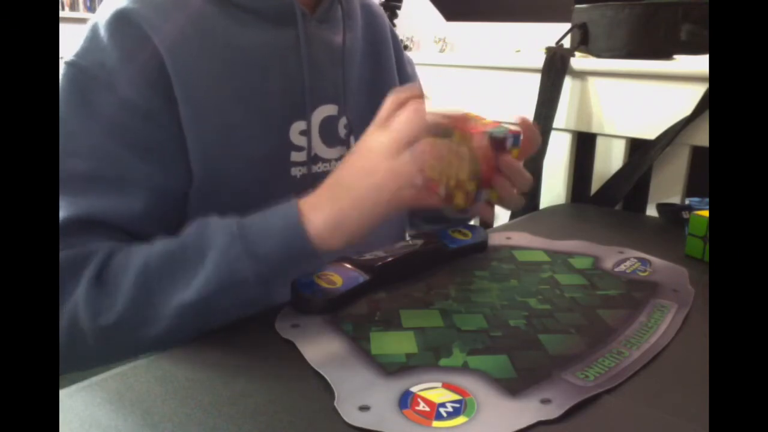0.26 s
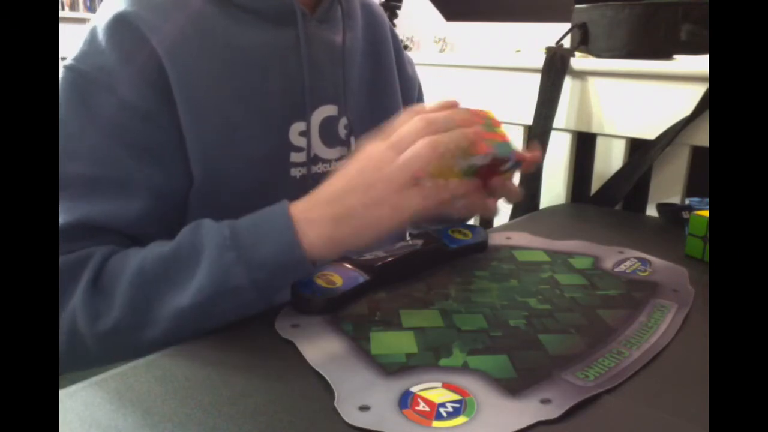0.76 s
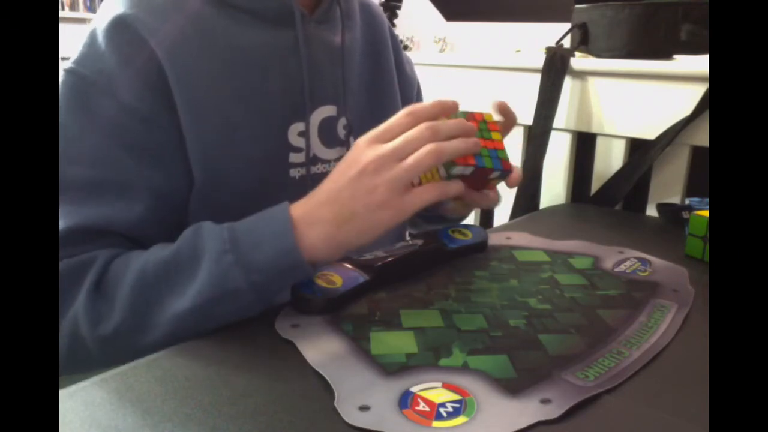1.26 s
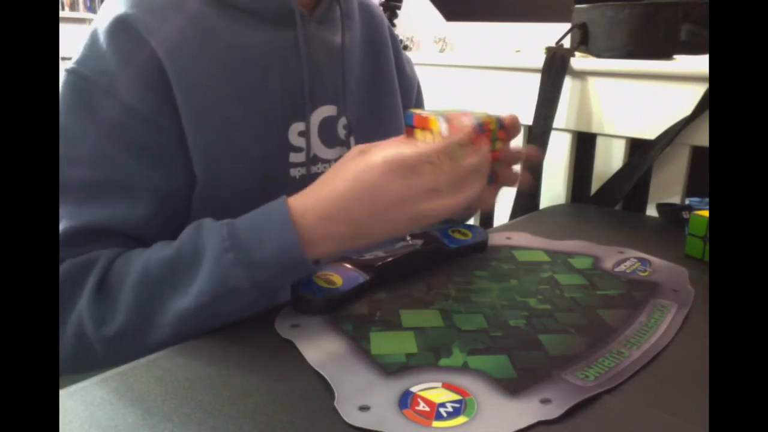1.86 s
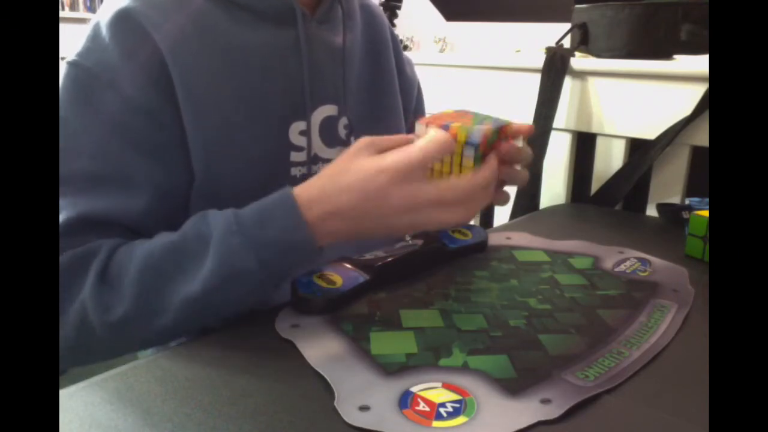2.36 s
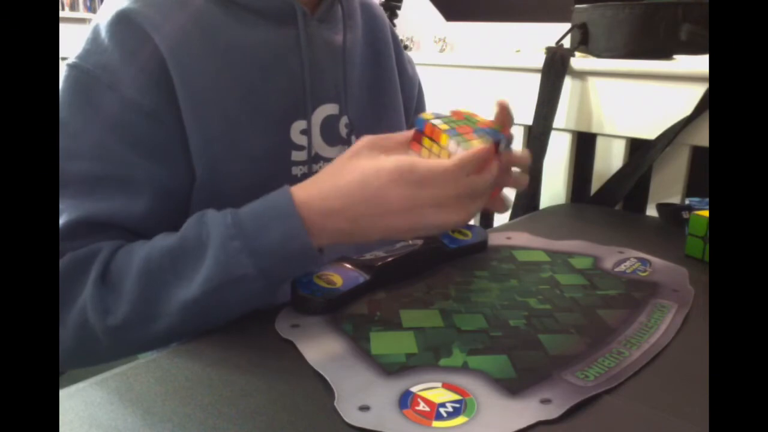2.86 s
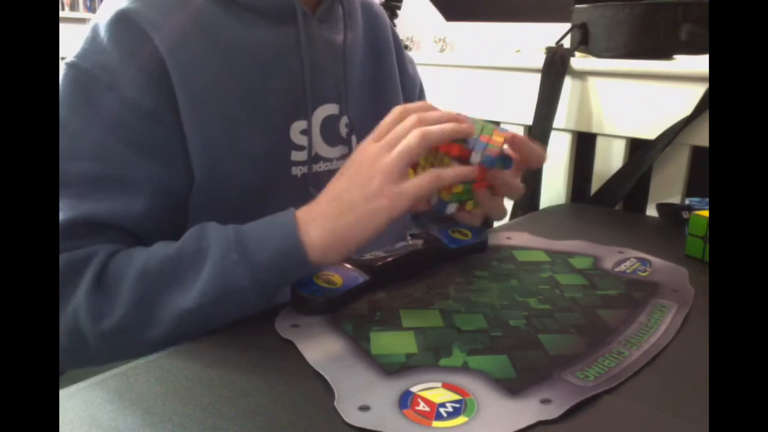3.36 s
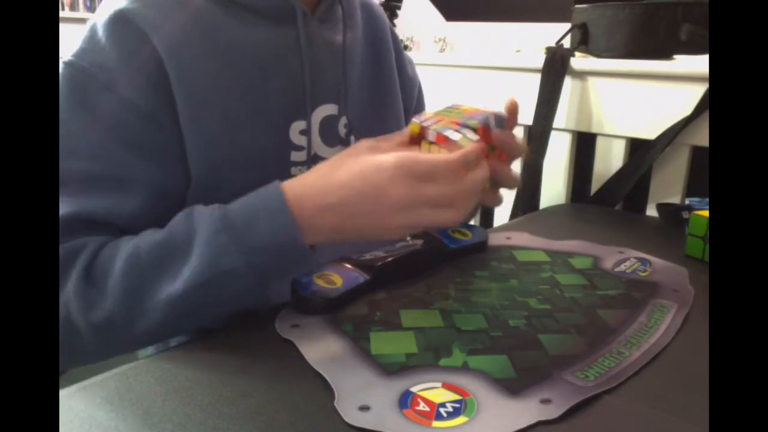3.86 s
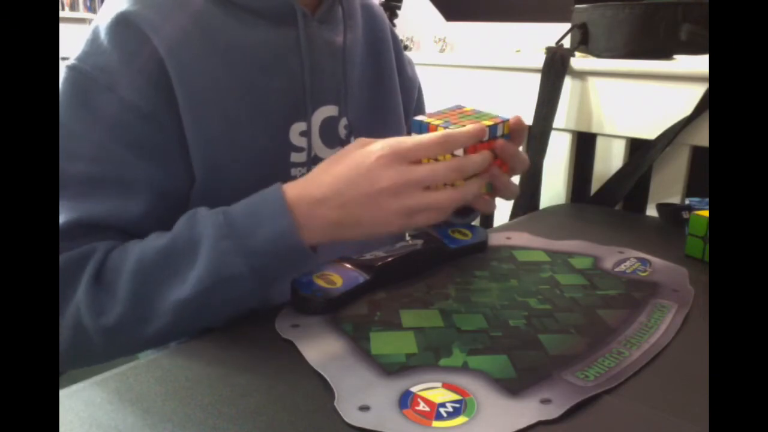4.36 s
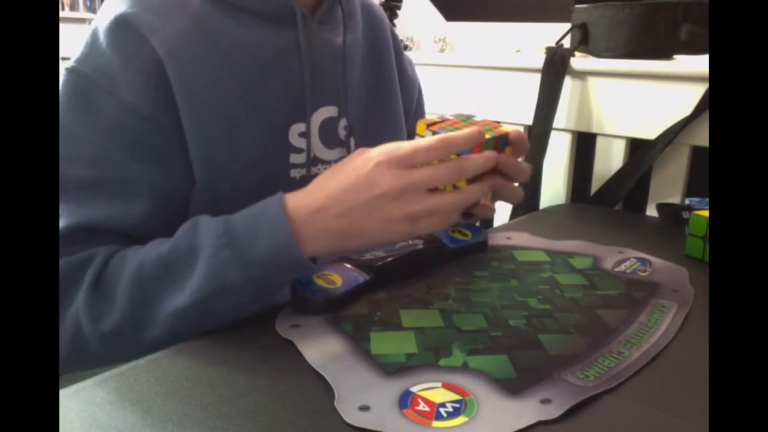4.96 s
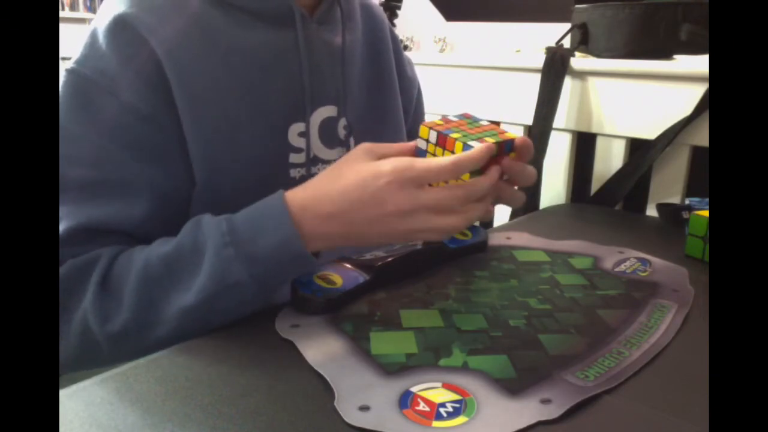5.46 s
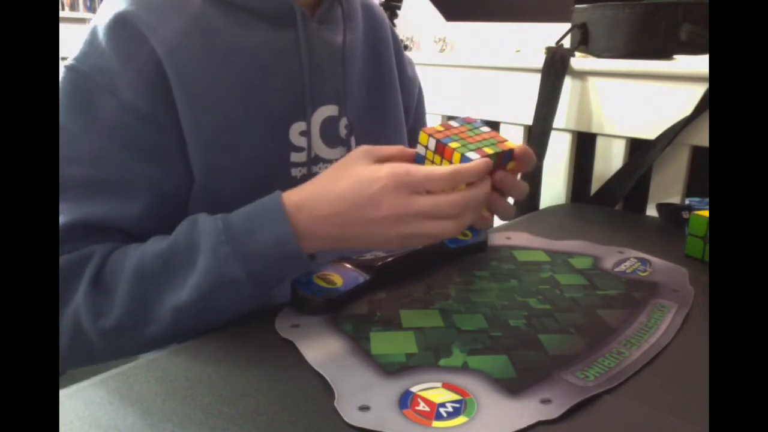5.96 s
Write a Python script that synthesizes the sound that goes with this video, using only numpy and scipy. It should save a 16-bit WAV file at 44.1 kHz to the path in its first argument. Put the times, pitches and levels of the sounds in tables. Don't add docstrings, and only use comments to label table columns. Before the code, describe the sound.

Small plastic pieces rattle, catch and snap as hands work a puzzle cube at a desk. After an immediate hard burst comes near-quiet, a brief stutter and a slap, then several tight runs of bright clicks and hollow clacks. A palm knock and wooden creak close the long run; a final turn and slaps follow. Close, dry sound with short room reflections and faint airy hum.

```python
import sys
import numpy as np
from scipy import signal
from scipy.io import wavfile
from scipy.ndimage import uniform_filter1d

SR = 44100
rng = np.random.default_rng(int(sys.argv[2]) if len(sys.argv) > 2 else 0)


def wav_record(signal):
    frames = np.transpose(np.atleast_2d(signal))
    bounded = np.clip(frames, -1, 1)
    quanta = np.round(bounded * 32767).astype(np.int16)
    wavfile.write(sys.argv[1], SR, quanta)


def voltage_ratio(level):
    return 10 ** (np.asarray(level, float) / 20)


N = 274302

# frequency in Hz, level in dB.
SLIDE_COLOUR = [(820, -26.5), (1400, -6.5), (2780, -3), (4360, -1), (8310, -10), (9620, -8.5),
                (13700, -9.5), (15400, -14.5), (16900, -24)]
# frequency in Hz, width in Hz (wider dies faster), level in dB.
CUBE_BODY = [(587, 130, -6), (808, 130, 1.5), (1084, 140, -3), (1460, 520, 13.5)]
# start in seconds, blow in dB, crack in dB relative to it, bounce delay in seconds, bounce in dB relative.
FLAT_SLAPS = [
    (1.9505, -15, -10.5, .0018, -13),
    (4.1437, -16, -1.5, .0013, 1.5),
    (4.8091, -17, 3.5, .0016, 0.5),
    (5.124, -29.5, 1.5, .0016, -2),
]


def evened(x):
    return x / np.sqrt(np.mean(x ** 2) + 1e-20)


def read(points, hz):
    f, value = np.transpose(points)
    return np.interp(np.log(hz + 1), np.log(f + 1), value)


def add(mix, s, sound):
    part = mix[max(round(s * SR), 0):][:len(sound)]
    part += sound[:len(part)]


def ring(modes, detune, phases, t, rise):
    x = 0
    for (hz, width, db), d, phase in zip(modes, detune, phases):
        fade = np.exp(-np.pi * width * t)
        x = x + voltage_ratio(db) * fade * np.sin(2 * np.pi * (hz * d * t + phase))
    x = x * (1 - np.exp(-(t / rise) ** 2))
    return x / np.abs(x).max()


def coloured(x, points):
    gain = np.log(voltage_ratio(read(points, np.abs(np.fft.fftfreq(4096, 1 / SR)))))
    taps = np.fft.ifft(np.exp(np.conj(signal.hilbert(gain)))).real[:1024]
    return signal.oaconvolve(x, taps)[:len(x)]


def snaps():
    # frequency in Hz, width in Hz, level in dB.
    edge_tones = [(9630, 510, -6), (10550, 670, -3.5), (11850, 770, -1.5), (14230, 1700, 1.5)]
    out, shake = np.zeros(N), np.zeros(N)
    t = np.arange(1200) / SR
    chatter = voltage_ratio(-12.0) * np.exp(-t / 0.00052) + voltage_ratio(-14) * np.exp(-t / 0.004)
    chatter = chatter * (1 - np.exp(-(t / .0004) ** 2))
    scrape = voltage_ratio(-20) * np.exp(-t[:200] / .0015)[::-1]
    rows = blows()
    chance = rng.random((len(rows), 24))
    for (s, db, rings, body_db, tick_db, crack_db, jammed, detuned), c in zip(rows, chance):
        detune = 1 + .16 * (c[:12] - .5)
        width = 460 + 480 * jammed ** 2
        piece = [(rings[0], width, 0), (rings[1], width, -5), (rings[2], width, -8)]
        rise = .00045 if jammed else .0011
        sound = ring(piece, [1, *detune[1:3] ** detuned], c[12:], t, rise)
        body_db = body_db + 3 * (2 * c[3] - 0.5)
        sound = sound + voltage_ratio(body_db) * ring(CUBE_BODY, detune[4:], c[16:], t, rise=0.0017)
        sound = sound + voltage_ratio(tick_db + 0.8) * ring(edge_tones, detune[8:], c[20:], t, rise=0.0004)
        add(out, s - .0003, voltage_ratio(db - 2.08) * sound)
        add(shake, s - .0003, voltage_ratio(db + crack_db) * chatter)
        add(shake, s - len(scrape) / SR, voltage_ratio(db + crack_db) * scrape)
    drive = shake * rng.standard_normal(N)
    crack = coloured(drive, SLIDE_COLOUR)
    return out + crack * np.std(drive) / np.std(crack)


def blows():
    # start in seconds, blow in dB, ring in Hz, edge tick in dB relative to the blow.
    clacks = [(.0545, -9.5, 4100, -13), (.0655, -16, 3490, -7.5), (.0732, -16, 3700, -3.5),
              (.1146, -12.5, 3100, -12.5), (.1223, -5.5, 2560, -9.5), (.1319, -2.5, 2160, -8.5),
              (.1388, -4.5, 3750, -17.5), (.1608, -3.5, 4800, -20.5), (.1782, -3, 2200, -13),
              (.2057, -16, 2280, -11.5), (1.3763, -16.5, 3280, -8), (2.2444, -22.5, 4510, -1),
              (2.2772, -8, 3450, -5.5), (2.3432, -24, 3660, 2), (2.4036, -14, 2600, -14),
              (2.7593, -13.5, 3600, 4.5), (2.9022, -6, 2240, 0.5), (2.9108, -13.5, 4200, 3),
              (2.9273, -18.5, 3140, 4.5), (3.2349, -21, 3700, -2), (3.2482, -18.5, 2470, -4),
              (3.4079, -20.5, 5000, -10), (3.5421, -17.5, 4330, -1), (3.5526, -14.5, 4300, -6),
              (3.5666, -6.5, 3120, -13.5), (3.5916, -19.5, 2430, -18), (3.6081, -25, 4750, -2),
              (3.9845, -19.5, 3920, -9), (3.9976, -19, 3900, -13), (4.0201, -26, 2550, -22),
              (.1537, -6, 1597, -12)]
    catches = [(.0367, -24, 3810, 0.5), (.046, -18, 3140, 5.5), (.0826, -17, 4500, 12),
               (.092, -20.5, 4990, 9.5), (.1516, -5, 4210, 4), (1.3074, -25.5, 4730, 9),
               (1.3672, -26.5, 3350, 6), (1.8189, -38.5, 3190, -4), (2.1571, -16.5, 4460, 6),
               (2.2002, -23.5, 3620, 6), (2.2411, -23.5, 4330, 4), (2.2535, -13, 4600, 0.5),
               (2.2639, -23, 4580, 4), (2.3963, -12.5, 3900, 2), (2.413, -20, 4130, 10.5),
               (2.8131, -26.5, 4500, 13.5), (2.8622, -24, 4480, 6.5), (2.875, -23, 4460, 6),
               (2.917, -18, 2800, 4.5), (3.2396, -23.5, 3440, -1), (3.4208, -15.5, 4470, 7.5),
               (3.7708, -26, 4300, 4), (3.8044, -18, 4100, 4), (3.8189, -24, 3340, 8),
               (3.8754, -18, 2900, 2), (3.9713, -12, 3200, 0.5), (4.0066, -22, 4230, 2),
               (1.829, -44, 4200, 8), (2.872, -21, 3800, -6), (2.8815, -24, 4100, 6),
              (2.9228, -16, 3900, -2), (2.9435, -20, 4400, -12), (3.2281, -20, 3550, 1),
              (3.4148, -21, 4500, 0), (3.4293, -20, 4800, 0), (3.4237, -24, 7100, -1), (3.7, -23, 4300, 0),
              (3.243, -22, 3400, 3), (3.2537, -23, 3500, -1), (3, -33, 3900, 3), (2.7335, -23.5, 5600, 6),
              (2.7455, -14, 2900, 6), (2.824, -31.5, 3700, 5), (2.829, -33.5, 4200, 4.5),
              (2.7665, -19, 3800, 3), (3.9665, -17.5, 3300, -6), (3.8975, -14, 3600, -8),
              (0.0056, -48, 3700, 8), (.133, -16, 3900, 6), (2.1275, -24, 4100, 4), (3.7962, -21, 6900, 6),
              (3.4315, -26, 5900, -4), (3.8, -26, 4900, -4), (2.7, -31, 1940, -8), (2.8745, -23, 3900, 2)]
    clicks = [(.1702, -10.5, 3325, -8.5), (.1862, -9, 2980, -15.5), (.2023, -4.5, 3890, -22),
              (1.3119, -19, 3460, -15), (1.393, -17.5, 2914, -13), (2.1467, -11.5, 3960, -12),
              (2.1528, -13, 4240, -1.5), (2.1665, -10.5, 4300, -3), (2.1911, -18.5, 3170, -15),
              (2.3835, -16.5, 3600, -3), (2.3891, -16, 3150, -14), (2.7409, -12, 3720, -3),
              (2.7479, -6.5, 3280, -5.5), (2.7785, -18.5, 3644, -8), (2.8796, -17, 4100, -11),
              (2.8928, -13.5, 4270, -15), (2.9375, -12, 3700, -21), (3.5782, -13, 4230, -1),
              (3.7147, -14.5, 4620, -4.5), (3.7905, -20, 4100, -2), (3.8951, -7, 4700, -9),
              (3.9055, -6.5, 3230, -11), (3.9188, -11.5, 2980, 2), (3.9331, -14, 3585, -4),
              (4.6612, -18, 4675, -18), (4.6643, -14, 4700, -22), (4.6738, -15, 3240, -16),
              (4.6803, -12, 3600, -10), (4.6915, -5, 3700, -22.5), (4.7195, -14.5, 4000, -10),
              (4.1413, -29.5, 3902, -14), (4.1375, -42, 4300, -14), (1.9478, -42.5, 3600, -14),
             (3.6913, -32.5, 4200, -14), (3.699, -29, 5200, -10), (3.7115, -27, 4500, -7),
             (3.7628, -29.5, 3700, -6), (3.753, -37.5, 4300, -10), (3.788, -29, 3900, -4),
             (3.7945, -19.5, 3860, -4), (3.8959, -10.5, 5650, -8), (3.8104, -27, 3000, -3),
             (1.3092, -24, 3300, -0.5), (1.3178, -25.5, 3200, 0), (1.326, -23.5, 3300, 0.5),
             (1.3515, -26, 3200, -8), (1.376, -19, 2680, -8.5), (1.3852, -23.5, 4000, -4.5),
             (1.3941, -19.5, 3320, -10), (1.424, -36.5, 3500, 5.5), (2.1605, -17.5, 5400, -8),
             (2.168, -16.5, 3500, -5), (2.2785, -15.5, 4300, -11), (2.3005, -21, 3600, -2),
             (2.7396, -17, 1790, -4), (2.749, -10, 4140, 2), (2.7605, -14, 2820, -3),
             (2.7734, -18.5, 3300, -5), (.0378, -25.5, 3400, 0), (0.0706, -19, 3000, 3),
             (.08, -22.5, 3200, 0), (0.139, -6.5, 4600, -6), (3.565, -13, 4500, -8),
             (3.5685, -14, 2000, -10), (3.548, -21, 2000, -4), (3.554, -19, 1900, -4),
             (2.892, -18, 4400, -2)]
    # start in seconds, blow in dB, ring in Hz.
    nudges = [(.0108, -25, 4350), (1.2955, -26.5, 4100), (1.2993, -25.5, 4740), (1.3275, -22.5, 3360),
              (1.3425, -23.5, 3600), (1.3549, -20, 4450), (2.125, -19, 3800), (2.1777, -24, 3820),
              (2.2178, -23, 4300), (2.3029, -20.5, 3500), (2.3115, -24, 2950), (2.7087, -23, 3520),
              (2.7187, -22.5, 4440), (2.8336, -24, 3140), (3.2318, -23, 3900), (3.2914, -22, 3940),
              (3.386, -27, 4100), (3.3948, -21.5, 3930), (3.5223, -22, 4230), (3.5299, -25, 4420),
              (3.7603, -24, 4440), (4.6432, -35, 4900), (4.7353, -22, 3900)]
    # start in seconds, blow in dB, ring in Hz.
    settles = [(0.029, -35, 3150), (.3603, -36, 3320), (0.7384, -40.5, 2887), (1.5462, -42, 3000),
               (1.838, -32, 4210), (2.079, -45, 3880), (2.1004, -35, 3600), (2.1125, -34.5, 3980),
               (2.115, -40, 4100), (2.359, -32, 3560), (2.3699, -32, 3800), (2.4564, -48, 4510),
               (2.5302, -45, 3730), (2.5639, -36.5, 3380), (2.58, -31.5, 3936), (2.6863, -38, 4400),
               (3.0355, -42, 3950), (3.068, -44.5, 3600), (3.0834, -39, 3409), (3.095, -47, 3300),
               (3.107, -40, 3200), (3.1186, -39.5, 4300), (3.1399, -40, 4570), (3.1574, -36, 4519),
               (3.1789, -40, 3900), (3.1995, -33.5, 3480), (3.2026, -30.5, 3400), (3.215, -37, 3420),
               (3.299, -34.5, 4300), (3.3397, -41, 3900), (3.3603, -38, 4300), (3.3753, -31, 3640),
               (3.378, -34.5, 3700), (3.5165, -36.5, 2290), (4.7911, -35, 3460), (4.8321, -32, 4720),
               (4.8632, -42, 3000), (4.888, -44, 3700), (4.918, -45, 3500), (5.087, -47, 3220),
               (5.104, -47, 3200), (4.478, -45, 3600), (4.607, -49, 4220)]
    # start in seconds, blow in dB, three rings in Hz.
    lone = [
        (0.769, -35, 3556, 3950, 3020),
        (1.8337, -28, 4040, 3390, 4855),
        (2.0603, -27.5, 5040, 3340, 2400),
        (2.5757, -23, 3860, 4650, 3180),
        (3.6934, -19, 2820, 4224, 3500),
        (3.8264, -15.5, 2240, 1840, 2900),
        (4.5663, -32.5, 3380, 3420, 3350),
    ]
    click_body_db = -20.5
    rows = []
    for table, body_db in [(clacks, -12.5), (catches, -21), (clicks, click_body_db)]:
        rows += [(s, db, hz, body_db, tick_db) for s, db, hz, tick_db in table]
    rows += [(s, db, hz, click_body_db, -11) for s, db, hz in nudges]
    rows += [(s, db, hz, -20, -14) for s, db, hz in settles]
    every = []
    for s, db, hz, body_db, tick_db in rows:
        crack_db = -4 if db < -21.5 else 0
        jammed = 1 if db > -21.5 else .45
        every.append((s, db, (hz, hz * 0.78, hz * 1.3), body_db, tick_db, crack_db, jammed, 1))
    for s, db, *rings in lone:
        every.append((s, db, rings, -20, -19, -18, 0, 0))
    for s, db, crack_db, *_ in FLAT_SLAPS:
        every.append((s, db + crack_db - 30, (3400, 2200, 5000), -20, -20, 30, 1, 0))
    return every


def slaps():
    # frequency in Hz, width in Hz, level in dB.
    slap_rings = [
        [(3350, 520, -2), (4050, 560, -2), (5600, 520, -6), (9100, 480, -5.5), (10700, 520, 1.5),
         (11700, 670, -8)],
        [(3500, 700, -11), (4440, 770, 0), (5306, 1000, -0.5), (6770, 1150, 0.5), (10380, 1200, 3),
         (13600, 1200, -6)],
        [(1280, 760, -12), (2400, 890, -7), (3600, 700, -2), (7550, 790, -3), (9060, 800, 1), (10140, 830, -1)],
        [(2200, 370, -9), (3450, 400, -1.5), (5870, 500, -11), (7100, 450, 2.5), (9480, 600, 4),
         (10600, 510, 1)],
    ]
    out, t = np.zeros(N), np.arange(900) / SR
    chance = rng.random((len(FLAT_SLAPS), 6))
    for (s, db, _, bounce_s, bounce_db), modes, phases in zip(FLAT_SLAPS, slap_rings, chance):
        sound = ring(modes, np.ones(6), phases, t, rise=0.00055)
        add(out, s - .0003, voltage_ratio(db) * sound)
        add(out, s - .0003 + bounce_s, voltage_ratio(db + bounce_db) * sound)
    return out


def rattle():
    # start in seconds, hardest push in seconds, end in seconds,
    # sliding strength in dB, fade by the end in dB.
    turns = [(.026, .038, 0.054, -31, 5), (.043, .056, 0.11, -22, 5), (.118, .14, 0.23, -14.5, 15.5),
             (1.292, 1.31, 1.361, -30.5, 6), (1.362, 1.38, 1.432, -29.5, 15), (2.705, 2.718, 2.89, -38, 4),
             (2.12, 2.155, 2.25, -22.5, 27), (2.24, 2.256, 2.328, -25.5, 9), (2.34, 2.344, 2.37, -34, 12),
             (2.379, 2.4, 2.464, -24.5, 18.5), (2.732, 2.75, 2.84, -20.5, 19.5),
             (2.859, 2.908, 2.97, -23, 9), (3.226, 3.244, 3.286, -29, 13), (3.383, 3.418, 3.45, -33.5, 12),
             (3.512, 3.525, 3.54, -40, 3), (3.54, 3.568, 3.615, -24.5, 11), (3.688, 3.716, 3.68, -33, 15),
             (3.784, 3.796, 3.9, -25, 20), (3.872, 3.907, 3.965, -20.5, 9.5),
             (3.952, 3.968, 4.015, -24, 10), (4.647, 4.69, 4.75, -27.5, 13)]
    strength, spent = np.zeros(N), np.zeros(N)
    for row in turns:
        force, late = turn(*row)
        add(strength, row[0], force)
        add(spent, row[0], late)
    draw = rng.random((N, 3))
    hit = draw[:, 0] < 2400 / SR
    knocks = hit * np.sign(draw[:, 1] - .5) * voltage_ratio(-1.7 * np.log(draw[:, 2] + .1))
    clumps = voltage_ratio(2.9 * evened(uniform_filter1d(rng.standard_normal(N), size=160)))
    drive = strength * (evened(knocks * clumps) + .35 * rng.standard_normal(N))
    body = ring(CUBE_BODY, np.ones(4), rng.random(4), np.arange(1200) / SR, rise=0.00069)
    slide = coloured(drive, SLIDE_COLOUR)
    slide = voltage_ratio(-5.5) * slide * np.std(drive) / np.std(slide)
    dull_hz, dull_db = 8050, -6
    treble = signal.sosfilt(signal.butter(4, dull_hz, "high", fs=SR, output="sos"), slide)
    low = signal.sosfilt(signal.butter(4, dull_hz, fs=SR, output="sos"), slide)
    slide = low + treble * voltage_ratio(2.0 + dull_db * spent)
    hollow = voltage_ratio(-20.0) * signal.oaconvolve(drive, body / np.linalg.norm(body))[:N]
    return slide + small_pieces(drive) + hollow


def turn(start, push, end, db, fade_db):
    grip_s, grip_db, creep_db = 0.0048, -23.5, -8.5
    t = np.arange(start, end, 1 / SR)
    gather = creep_db * (1 - np.clip((t - start) / (push - start), 0, 1) ** 2.7)
    grip = grip_db * np.clip(1 - (t - start) / grip_s, 0, 1)
    spent = np.clip((t - push) / (end - push), 0, 1)
    return voltage_ratio(db + grip + gather - fade_db * spent), spent


def small_pieces(drive):
    # frequency in Hz, width in Hz, level in dB.
    piece_tones = [(2260, 790, -3.5), (3470, 400, -4.5), (3700, 1400, -3), (4300, 700, -1.5),
                   (4800, 370, -5.5), (9950, 1200, -7.5), (13900, 1300, -9)]
    which = np.repeat(rng.integers(0, len(piece_tones), N // 110 + 1), 110)[:N]
    t = np.arange(400) / SR
    out = np.zeros(N)
    for k, (hz, width, db) in enumerate(piece_tones):
        sound = voltage_ratio(db) * evened(ring([(hz, width, 0)], [1], [0], t, rise=0.00041)) / 20
        out += signal.oaconvolve(drive * (which == k), sound)[:N]
    return out * voltage_ratio(-6)


def thumps():
    # start in seconds, level in dB, frequency in Hz.
    palm_knocks = [
        (3.569, -38.5, 274),
        (3.824, -30, 208),
    ]
    out, t = np.zeros(N), np.arange(2600) / SR
    for s, db, hz in palm_knocks:
        swell = np.exp(-t / 0.005) * (1 - np.exp(-t / 0.0011))
        add(out, s, voltage_ratio(db + 2.0) * np.sin(2 * np.pi * hz * t) * swell)
    return out


def creaks():
    # time in seconds, level in dB.
    creak_levels = [
        [(.28, -54.5), (.4, -69), (.55, -73), (.7, -60.5), (.86, -74)],
        [(3.824, -53), (3.87, -63), (3.95, -40), (4.0, -40), (4.06, -43), (4.08, -51), (4.14, -56), (4.3, -64)],
    ]
    # frequency in Hz, width in Hz, level in dB.
    desk_tones = [(650, 60, -1), (810, 70, 1), (1800, 110, -8), (2250, 80, -6)]
    # start in seconds, level in dB, frequency in Hz, width in Hz.
    wrist_taps = [
        (3.827, -28.5, 2235, 45),
        (3.842, -33, 2230, 50),
        (3.865, -35, 2240, 50),
        (4.016, -33, 2260, 110),
        (4.041, -40, 2270, 90),
    ]
    level, t = np.zeros(N), np.arange(2000) / SR
    for rows in creak_levels:
        s, db = np.transpose(rows)
        add(level, s[0], voltage_ratio(np.interp(np.arange(s[0], s[-1], 1 / SR), s, db)))
    slips = (rng.random(N) < 1100 / SR) * rng.standard_normal(N)
    wood = ring(desk_tones, np.ones(4), rng.random(4), t, rise=0.00048)
    out = level * evened(signal.oaconvolve(slips, wood)[:N])
    for s, db, hz, width in wrist_taps:
        add(out, s, voltage_ratio(db) * ring([(hz, width, 0)], [1], [0], t, rise=0.0017))
    return out


def room(x, tail_db=-17):
    # frequency in Hz, time to fall by 60 dB in seconds.
    ring_times = [(300, 0.17), (800, 0.14), (2000, 0.14), (4000, 0.17), (9000, 0.17), (15000, 0.029)]
    # delay in seconds, level in dB.
    close_echoes = [(.0013, -34.5), (.0022, -23), (.0033, -17), (.0047, -26), (.0075, -23.5)]
    taps = np.zeros(SR // 2)
    at = np.arange(0, len(taps) - 16, 16)
    taps[at + rng.integers(0, 16, len(at))] = rng.choice([-1., 1.], len(at))
    hz, t, z = signal.stft(taps, SR, nperseg=256)
    fade = voltage_ratio(-60 * t / read(ring_times, hz)[:, None])
    tail = signal.istft(z * fade, SR, nperseg=256)[1][:len(taps)]
    delay = np.arange(len(taps)) / SR
    tail = tail * np.clip(delay / .013, 0, 1) ** 3
    tail = tail * voltage_ratio(2.5 * np.exp(-((delay - .021) / .01) ** 2))
    tail = voltage_ratio(tail_db) * tail / np.linalg.norm(tail)
    tail[0] += 1
    for k, (s, db) in enumerate(close_echoes):
        tail[round(s * SR)] += (-1) ** k * voltage_ratio(db)
    return signal.fftconvolve(x, tail)[:N]


def air():
    # frequency in Hz, level in dB.
    air_colour = [(18, -51), (40, -32), (56, -9), (91, -13), (110, -1), (511, -14), (823, -10.5),
                  (1160, -18.5), (1920, -14.5), (2640, -23), (2860, -21.5), (3540, -22), (9000, -26.5),
                  (10500, -25.5), (11500, -28.5), (14800, -29.5), (16900, -52.5)]
    # time in seconds, level in dB.
    air_level = [(0, -56), (.421, -60.5), (.8, -61), (.9, -64), (1.2, -66), (1.29, -62.5), (1.47, -59.5),
                 (1.87, -63), (2.32, -57), (3.1, -58), (3.97, -58), (4.49, -61.5), (5.039, -60),
                 (5.489, -65.5), (6.1, -66), (6.22, -65.5)]
    # frequency in Hz, level in dB.
    hum_tones = [(59.2, -83), (118.4, -74), (1922, -81), (2762, -90), (2880, -86)]
    frames, hz = N // 256 + 5, np.fft.rfftfreq(1024, 1 / SR)
    a, b, patches = rng.standard_normal((frames, 513, 3)).T
    patches = uniform_filter1d(patches, size=10, axis=0)
    patches = evened(uniform_filter1d(patches, size=16, axis=1))
    s, db = np.transpose(air_level)
    drift_db = np.interp(np.arange(frames) * 256 / SR, s, db) + 62
    treble = np.clip(hz / 2500, 0, 1)[:, None] * (0.9 + .3 * drift_db)
    colour = voltage_ratio(read(air_colour, hz)[:, None] + treble + 0.5 * patches)
    noise = signal.istft((a + 1j * b) * colour, nperseg=1024, noverlap=768)[1][:N]
    t = np.arange(N) / SR
    waver = evened(uniform_filter1d(rng.standard_normal((len(hum_tones), N)), size=6000, axis=1))
    hum = np.zeros(N)
    for (f, level_db), w in zip(hum_tones, waver):
        hum += voltage_ratio(level_db + 68 + 2.5 * w) * np.sin(2 * np.pi * f * t + 1.6 * w)
    return voltage_ratio(np.interp(t, s, db)) * (voltage_ratio(3.0) * evened(noise) + hum)


def scene():
    hard = snaps() + slaps() + creaks()
    hard = signal.sosfilt(signal.butter(2, 440, "high", fs=SR, output="sos"), hard)
    return (room(hard + rattle() + thumps()) + air())[None]


def low_pass(x):
    return signal.sosfilt(signal.butter(12, 17030, fs=SR, output="sos"), x)


def record(dry):
    # frequency in Hz, level in dB.
    mic_colour = [(20, -11), (60, -5), (150, -1), (7600, 1), (8400, -4), (9100, 0), (10500, 2), (12500, -4),
                  (14000, -1.5), (16000, -3.5), (17000, -12), (17300, -40)]
    x = voltage_ratio(-0.05) * coloured(dry[0], mic_colour)
    x = x / (1 + np.abs(x / .93) ** 8) ** .125
    return low_pass(x[None])


dry = scene()
out = record(dry)
wav_record(out)
```